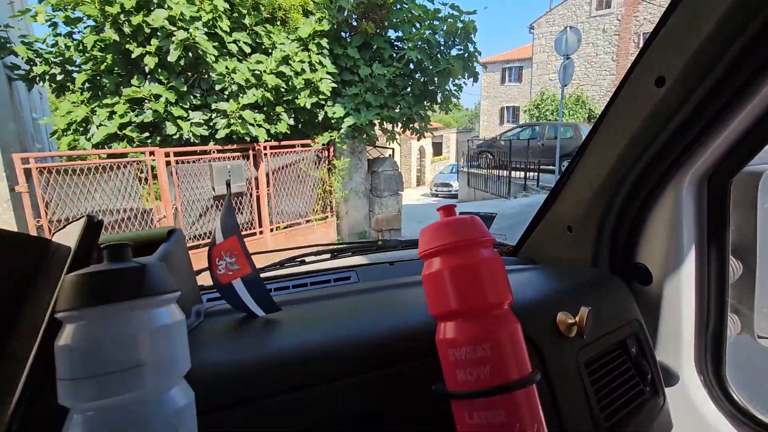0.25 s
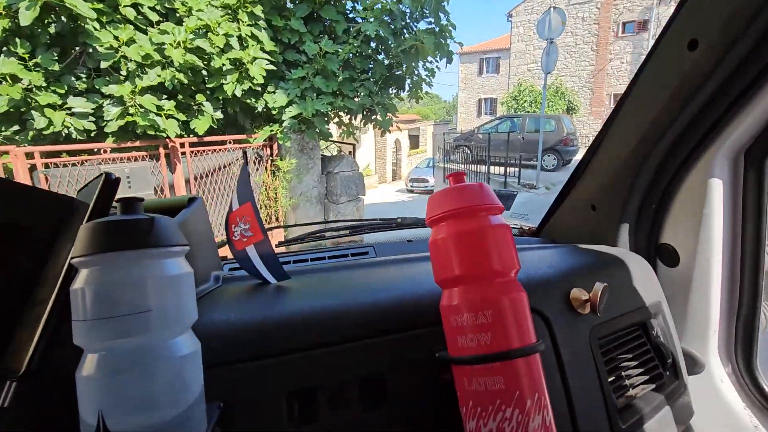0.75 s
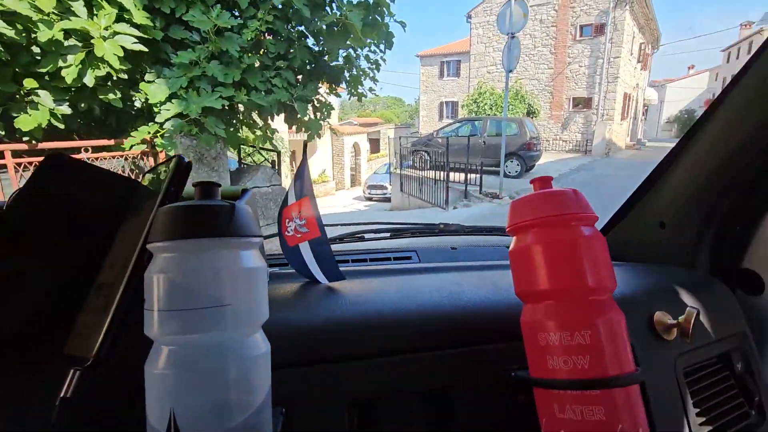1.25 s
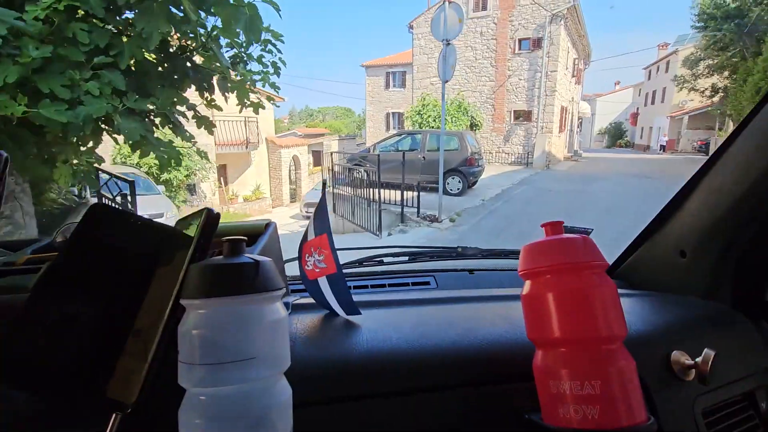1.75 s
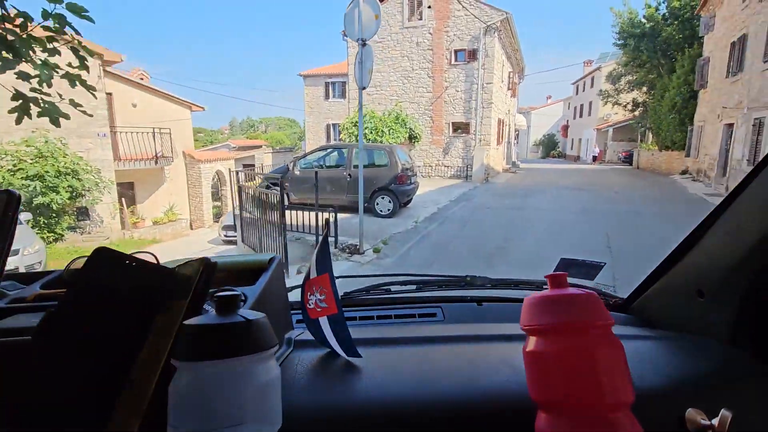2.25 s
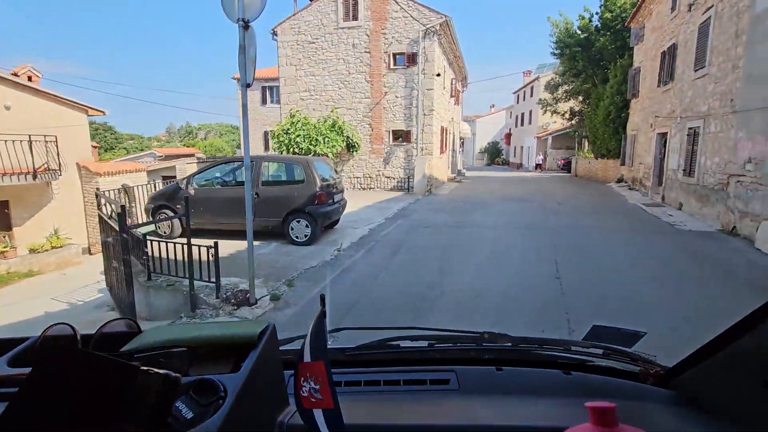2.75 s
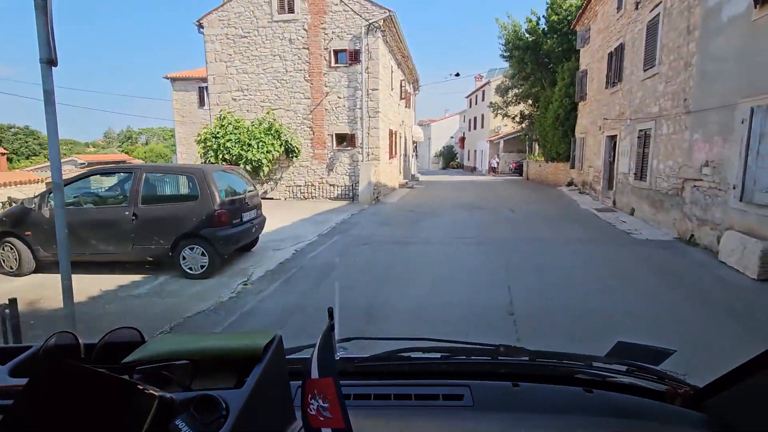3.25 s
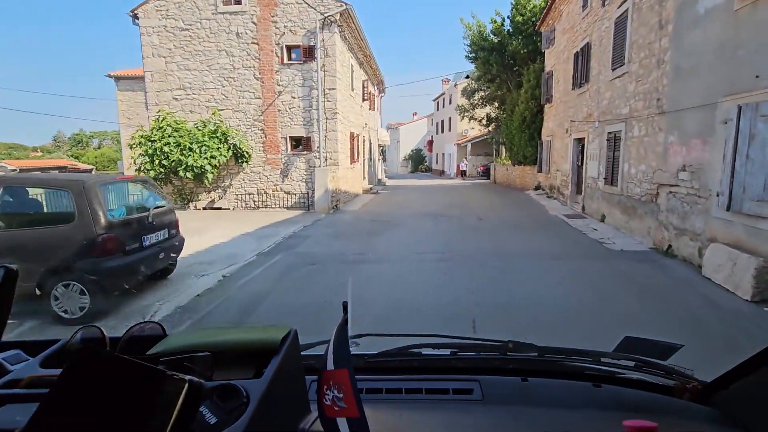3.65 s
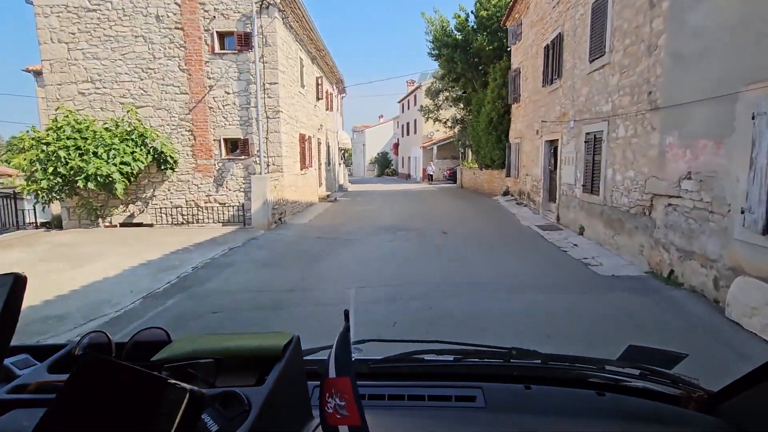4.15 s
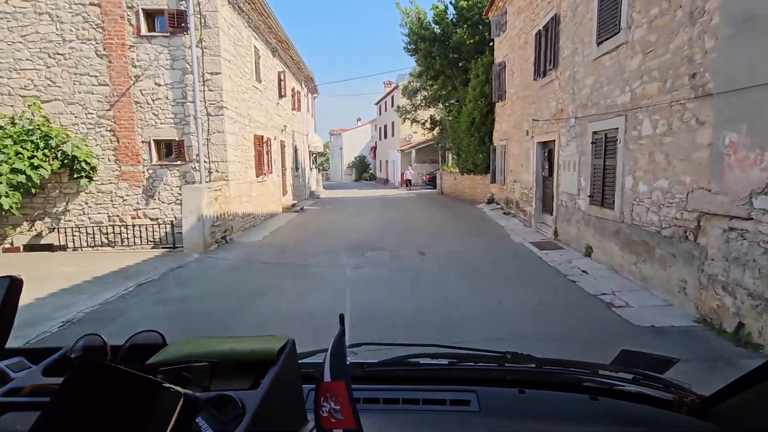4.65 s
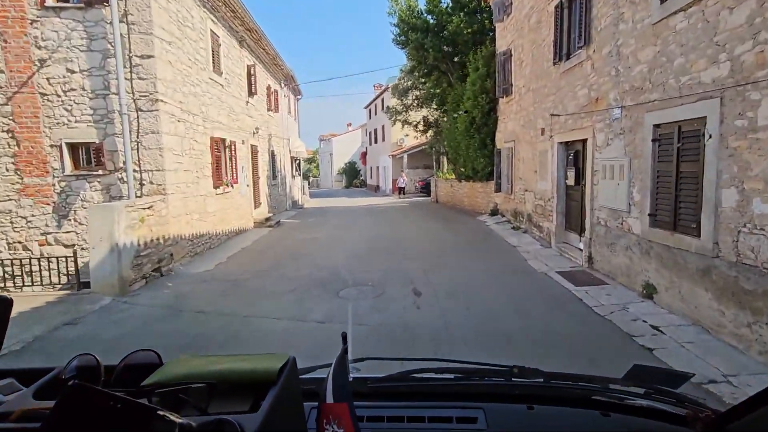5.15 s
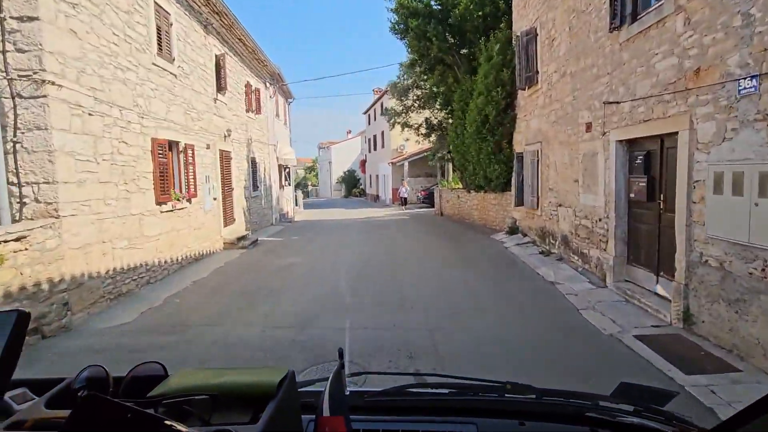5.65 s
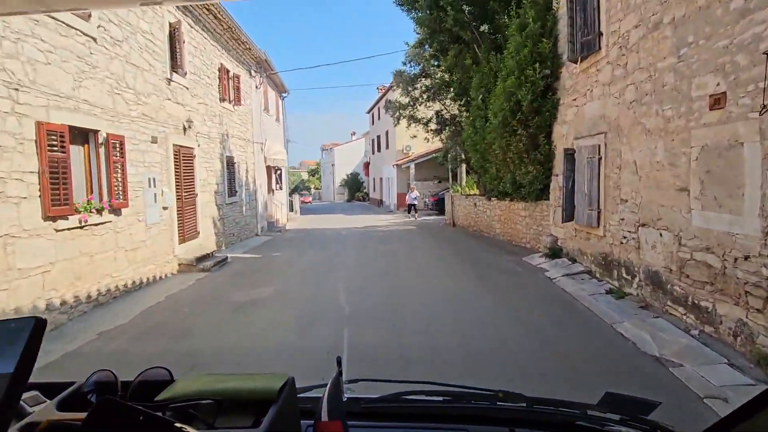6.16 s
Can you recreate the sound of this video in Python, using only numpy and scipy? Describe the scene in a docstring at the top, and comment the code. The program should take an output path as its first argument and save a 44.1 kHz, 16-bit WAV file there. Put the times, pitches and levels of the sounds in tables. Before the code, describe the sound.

Cab interior of a rolling diesel van: droning engine revs up, changes gear, revs again, while bumps thud and loose plastic ticks and knocks.

```python
"""Diesel van changing up a gear

Inside the cab along a village street: the engine climbs, the driver changes up, and it climbs again.
Tones and panel resonances locked to the firing rate make its boom and knock; noise bands make the rattle.
Tyres rumble in coloured noise, and bumps swell the bass of the cab and thud.
Hard plastic snaps once in a run of ringing contacts, loose things tick, squeak and knock in short bursts,
and a swish of noise brushes past during the gear change."""
import sys
import numpy as np
from scipy import signal
from scipy.fft import rfft, irfft
from scipy.io import wavfile
from scipy.ndimage import uniform_filter1d

SR = 44100
rng = np.random.default_rng(int(sys.argv[2]) if len(sys.argv) > 2 else 0)


def store_pcm(level_fs):
    """Save levels as 16-bit WAV."""
    pcm = np.round(np.clip(level_fs, -1, 1) * 32767).astype(np.int16)
    wavfile.write(sys.argv[1], SR, np.atleast_2d(pcm).T)


N = 282240
TIME = np.arange(N) / SR

# bumps in the road: (t/s, body shake level/dB, cab drumming level/dB, thud level/dB)
BUMPS = [(0.16, -23.5, -19, -45), (0.679, -24, -33.5, -28.5), (1.296, -36.5, -15.5, -51),
         (1.558, -28, -19, -51), (2.001, -22.5, -25, -50), (2.77, -20.5, -23.5, -30.5),
         (3.3, -21.5, -18.5, -38), (3.829, -27, -16.5, -45.5), (4.12, -32.5, -18, -49)]
# colour of light plastic contacts, before any tilt: (f/Hz, level/dB)
TICK_COLOUR = [(800, -22.5), (2500, -3.5), (5000, -2), (7500, -3.5), (9500, -4.5), (11600, -1.5),
               (13500, -4.5), (16000, -10)]
# level of one buzzing panel, which comes and goes: (t/s, level/dB)
PANEL_BUZZ = [(0, -2), (.33, 4.5), (.55, -3), (.9, -3), (1.08, 2), (1.16, -2), (1.65, 0), (1.77, -4),
              (1.87, 1.5), (2.04, 2), (2.13, -4), (2.3, -3), (2.42, 7), (2.6, -1), (4.5, -2), (6.4, -2.5)]


def from_db(db):
    """Decibels to gain."""
    return 10 ** (np.asarray(db) / 20)


def rms_one(x):
    """Scale to unit power."""
    return x / np.sqrt(np.mean(x ** 2) + 1e-20)


def in_time(rows):
    """Each column of a curve at every sample."""
    s, *columns = np.transpose(rows)
    return [np.interp(TIME, s, column) for column in columns]


def at_hz(points, hz):
    """Read a spectrum on a log-frequency axis."""
    f, value = np.transpose(points)
    return np.interp(np.log(hz + 1), np.log(f), value)


def drift(rate):
    """A random wander of rms 1, through a given number of knots per second."""
    knots = rng.standard_normal(int(N / SR * rate) + 2)
    return rms_one(np.interp(TIME * rate, np.arange(len(knots)), knots))


def swell(s, rise_s, fall_s):
    """An envelope that grows exponentially to 1 at a given time and dies away."""
    return np.exp(-np.maximum((s - TIME) / rise_s, (TIME - s) / fall_s))


def dying(t, t60):
    """Decay by 60 dB in t60."""
    return np.exp(-np.log(1000) * t / t60)


def in_cab(mid, side, hz):
    """Two unrelated spectra become left and right: alike in the bass, diffuse in the treble."""
    # how alike the two sides are: (f/Hz, correlation)
    likeness = [(60, .99), (115, 0.91), (200, 0.71), (380, 0.74), (700, 0.16), (1290, -0.5), (2300, 0.056),
                (4400, -0.11), (16000, 0.062)]
    # left over right: (f/Hz, level/dB)
    balance = [(60, 0.5), (130, -2.5), (280, 3), (550, 0.5), (1100, 0.5), (2200, 1), (12000, 1)]
    alike = np.clip(at_hz(likeness, hz), -1, 1)
    sign = np.array([[1], [-1]])
    sides = np.sqrt(1 + alike) * mid + sign * np.sqrt(1 - alike) * side
    return sides * from_db(sign * at_hz(balance, hz) / 2)


def noise(colour, size=N):
    """Stereo noise of a given colour, falling away beyond its ends; rms 1."""
    hz = np.fft.rfftfreq(size, 1 / SR)
    ends = np.minimum(hz / colour[0][0], 1) ** 2 / np.maximum(hz / colour[-1][0], 1) ** 2
    mid, side = rfft(rng.standard_normal((2, size))) * from_db(at_hz(colour, hz)) * ends
    return rms_one(irfft(in_cab(mid, side, hz), size))


def even(x, span_s):
    """Hold the power of a vibration steady over a short span."""
    power = uniform_filter1d(np.mean(x ** 2, axis=0), max(int(span_s * SR), 2))
    return x / np.sqrt(np.maximum(power, 0) + 1e-12)


def resonance(x, hz, width_hz):
    """A two-pole resonance with gain 1 on top."""
    r = np.exp(-np.pi * width_hz / SR)
    zeros = np.array([1, 0, -1]) * (1 - r * r) / 2
    poles = [1, -2 * r * np.cos(2 * np.pi * hz / SR), r * r]
    return signal.lfilter(zeros, poles, x)


def through(modes, hz):
    """The gain of a set of resonances at a moving frequency."""
    power = sum(from_db(db) ** 2 / (1 + ((hz - f) / width) ** 2 * 2) ** 2 for f, width, db in modes)
    return np.sqrt(power)


def add(out, s, sound):
    """Mix a short sound in at a given time."""
    start = int(s * SR)
    out[:, start:start + sound.shape[1]] += sound[:, :N - start]


def burst(colour, t60, rise_s):
    """A contact and its dense reflections in the small cab, as decaying noise."""
    t = TIME[:SR // 4]
    return noise(colour, size=len(t)) * dying(t, t60) * (1 - np.exp(-t / rise_s))


def cab_echoes(x, wet_db, t60):
    """Windscreen and dashboard return a dense spray of early reflections that colours bright sounds."""
    t = TIME[:SR // 16]
    spray = rms_one(rng.standard_normal((2, len(t))) * dying(t, t60))
    response = spray * from_db(wet_db) / np.sqrt(len(t))
    response[:, 0] += 1  # the direct sound
    return signal.fftconvolve(x, response, axes=1)[:, :N] / np.sqrt(1 + from_db(wet_db) ** 2)


def air_hiss():
    """Air hisses unsteadily in the treble, with close reflections."""
    # level before the echoes: (t/s, level/dB)
    air = [(0, -63.5), (.3, -60.5), (2.2, -60.5), (3.2, -70.5), (3.55, -63.5), (3.9, -73), (4.6, -63),
           (5.85, -68), (6.4, -66)]
    # colour: (f/Hz, level/dB)
    hiss_colour = [(1500, -17.5), (3500, 3), (5300, 0.5), (6500, -4.5), (7500, -3), (10000, -11.5),
                   (10900, -9), (11600, -3), (12500, -10.5), (16000, -10)]
    hiss = from_db(in_time(air)[0] + 1.0 * drift(31)) * noise(hiss_colour)
    return cab_echoes(hiss, wet_db=-8.0, t60=0.043)


def bass_of_road(rolling_db):
    """Bumps shake the body, drum the cab's lowest air mode and swell the low tyre rumble."""
    # colours of the body shake, cab drumming and tyre rumble: (f/Hz, level/dB per Hz)
    shake_colour = [(15, -16.5), (24, -15), (33, 7.5), (44, -1), (55, -10), (80, -39.5)]
    drum_colour = [(35, -44.5), (48, -12), (56, 4), (62, 0), (72, -22.5), (95, -28.5)]
    rumble_colour = [(55, -25.5), (80, 1), (105, 2.5), (130, -6.5), (165, -12.5), (220, -34.5), (400, -52)]
    # level of the tyre rumble between bumps: (t/s, level/dB)
    rumbling = [(0, -38.5), (1, -33), (1.5, -32.5), (2.1, -39.5), (2.8, -35), (3.1, -38), (3.3, -34.5),
                (3.8, -40), (4.5, -32), (5.3, -31.5), (5.9, -37), (6.4, -38)]
    shake_db, drum_db = -37.5, -36  # at a rolling level of 0 dB
    bump_rise_s, bump_fall_s = 0.098, 0.083
    bump_rumble_db = -8.5  # tyre rumble against the shake of a bump
    steady = from_db(0.85 * rolling_db)  # the bass follows only a share of the swing
    jolt, boom = sum(from_db([[bump_shake], [bump_drum]]) * swell(s, bump_rise_s, bump_fall_s)
                     for s, bump_shake, bump_drum, _ in BUMPS)
    shake = np.hypot(from_db(shake_db) * steady, jolt) * even(noise(shake_colour), span_s=0.28)
    drum = np.hypot(from_db(drum_db) * steady, boom) * even(noise(drum_colour), span_s=0.041)
    rumble_gain = np.hypot(from_db(in_time(rumbling)[0]), from_db(bump_rumble_db) * jolt)
    return shake + drum + rumble_gain * even(noise(rumble_colour), span_s=0.44)


def tyre_roar(rolling_db):
    """The tyres roar unevenly on the surface, throbbing for a while as the van gathers speed."""
    # colour: (f/Hz, level/dB per Hz)
    roar_colour = [(110, -20.5), (170, -6.5), (215, 0), (280, -2.5), (335, 2), (390, -8.5), (460, -3.5),
                   (530, -8), (640, -7.5), (790, -11.5), (900, -7.5), (1000, -22.5), (2500, -53.5)]
    roar_db = -45  # at a rolling level of 0 dB
    throb_at_s, throb_per_s, throb_depth_db, throb_fade_s = 4.46, 5.1, 1, 0.81
    lumps_db = 1.6 * drift(18)
    throb = np.cos(2 * np.pi * throb_per_s * (TIME - throb_at_s))
    throb_db = throb_depth_db * swell(throb_at_s, throb_fade_s, throb_fade_s) * throb
    return from_db(roar_db + rolling_db + lumps_db + throb_db) * even(noise(roar_colour), span_s=0.43)


def road():
    """Road bass and tyre roar share one rolling level; air hiss lies above them."""
    # how hard the tyres work on the road surface: (t/s, level/dB)
    rolling = [(0, -0.5), (.3, 4.5), (1.5, 0.5), (2.05, -7.5), (2.5, -6.5), (2.8, 3), (3.1, -7.5), (3.3, 2),
               (4.2, 2), (5.4, 4), (6.4, -.5)]
    rolling_db, = in_time(rolling)
    return bass_of_road(rolling_db) + tyre_roar(rolling_db) + air_hiss()


def thumps(t60):
    """A bump passes through the suspension as a dull thud."""
    # colour: (f/Hz, level/dB)
    thump_colour = [(110, -6.5), (200, -6.5), (250, 2.5), (330, -11.5), (700, -19)]
    out = np.zeros((2, N))
    for s, _, _, db in BUMPS:
        add(out, s, from_db(db) * burst(thump_colour, t60, rise_s=0.0014))
    return out


def jiggle(count, level_db, spread_db):
    """Bottles and holders touch faintly at random times, each touch ringing at a random pitch."""
    out = np.zeros((2, N))
    for when, softness, pitch in rng.random((count, 3)):
        contact = burst(TICK_COLOUR, 0.079, rise_s=.001)
        touch = rms_one(resonance(contact, 2800 * 4 ** pitch, 1700))
        add(out, when * N / SR, from_db(level_db - spread_db * softness) * touch)
    return out


def squeaks(gain_db, wobble, overtone_db):
    """Rubbing plastic sticks and slips in a brief, unsteady tone with overtones."""
    # each squeak, level before the gain: (t/s, length/s, f/Hz, level/dB)
    rubs = [(2.551, 0.062, 2800, -60), (2.624, 0.033, 2500, -62), (2.734, 0.035, 2860, -61),
            (2.753, 0.032, 2470, -61), (3.055, 0.05, 3200, -63), (3.185, 0.023, 2270, -64),
            (3.208, 0.0184, 2140, -67)]
    out = np.zeros((2, N))
    for s, length, hz, db in rubs:
        envelope = np.hanning(int(length * SR))
        slip = rms_one(uniform_filter1d(rng.standard_normal(len(envelope)), 40))
        turns = np.cumsum(hz * (1 + wobble * slip)) / SR
        tone = sum(from_db(overtone_db * (k - 1)) * np.sin(2 * np.pi * k * (turns + rng.random((2, 1))))
                   for k in range(1, 5))
        add(out, s, from_db(db + gain_db) * np.sqrt(2) * envelope * tone)
    return out


def ticks(t60, gain_db, ring_db, ring_width_hz):
    """Loose plastic ticks on the dashboard, each piece with a brightness and a ring of its own."""
    # each tick, level before the gain; brightness tilts the colour, -9 dB leaving it flat:
    # (t/s, level/dB, brightness/dB, ring f/Hz)
    taps = [(0.2148, -46, -13, 11700), (0.289, -38.5, -11, 7000), (0.599, -45, -7, 4500),
            (0.6365, -41.5, -9, 6500), (0.971, -40.5, -10, 7300), (1.321, -41, -10, 6650),
            (1.656, -38.5, -13, 7500), (1.83, -50.5, -6, 6900), (2.002, -47, -9, 6400),
            (2.339, -45, -14, 7070), (2.6896, -47, -12, 6500), (3.024, -44.5, -16, 6940),
            (3.0977, -39, -15, 11700), (3.119, -31, -10.5, 7450), (3.15, -46, -10, 6500),
            (3.23, -43, -14, 5100), (3.431, -50.5, -14, 4100), (3.6, -46, -18, 4400),
            (3.629, -50, -10, 5170), (3.694, -50, -8, 5140), (4.0637, -48, -11.5, 5170),
            (4.297, -42, -17.5, 11700), (4.32, -43.5, -14, 11700), (4.357, -44, -15.5, 11700),
            (4.411, -46, -11, 11700), (4.4336, -44, -15, 11700), (4.555, -47, -14, 11700),
            (5.89, -52, -17, 4100), (6.112, -48.5, -13, 5200)]
    out = np.zeros((2, N))
    for s, db, top_db, ring_hz in taps:
        tilt_db_per_octave = top_db + 9.0
        colour = [(hz, level + tilt_db_per_octave * np.log2(hz / 6000)) for hz, level in TICK_COLOUR]
        touch = burst(colour, t60, rise_s=0.00092)
        ring = from_db(ring_db) * resonance(touch, ring_hz, ring_width_hz)
        add(out, s, from_db(db + gain_db) * (touch + ring))
    return out


def brush_past():
    """A brushing swish of bright noise swells and fades."""
    # colour: (f/Hz, level/dB)
    brush_colour = [(900, -18.5), (2400, -0.5), (3500, 3), (6000, 2.5), (9500, -0.5), (11600, 3.5),
                    (16000, 0)]
    return from_db(-53) * swell(2.783, rise_s=0.13, fall_s=0.1) * noise(brush_colour)


def knocks(gain_db):
    """The trim knocks as the body flexes: noise contacts ring its resonances, each with a brightness of its
    own."""
    # each knock, level before the gain: (t/s, level/dB, t60/s, brightness f/Hz)
    contacts = [(0.245, -46, 0.21, 2490), (0.347, -46.5, 0.39, 2480), (0.686, -33.5, 0.1, 1720),
                (0.754, -45, 0.1, 4000), (0.973, -41.5, 0.1, 2500), (2.758, -43.5, 0.08, 2200),
                (2.779, -44, 0.083, 2200), (2.799, -41, 0.058, 1900), (4.301, -51, 0.3, 2490),
                (4.4, -47.5, 0.18, 2500), (4.4631, -28, 0.091, 9100), (5.74, -34.5, 0.093, 2190)]
    # what the trim rings with: (f/Hz, width/Hz, level/dB)
    trim = [(1167, 140, 5), (1560, 250, 1.5), (2270, 150, -1), (2930, 150, -2.5), (3900, 740, -6.5),
            (5370, 740, -10.5), (6800, 2600, -16)]
    out, t = np.zeros((2, N)), TIME[:SR // 4]
    for s, db, t60, bright_hz in contacts:
        contact = noise([(300, 0), (bright_hz, 0), (2 * bright_hz, -9)], size=len(t))
        # neighbouring resonances have opposite signs
        rung = rms_one(sum((-1) ** k * from_db(level) * resonance(contact, hz, width)
                           for k, (hz, width, level) in enumerate(trim)))
        add(out, s, from_db(db + gain_db) * rung * dying(t, t60) * (1 - np.exp(-t / 0.00077)))
    return out


def snap(crack_db, spray_db, ring_db, t60):
    """Hard plastic snaps home in a quick run of contacts: a crack, its spray of reflections, a short ring."""
    # the contacts, level shared by crack, spray and ring: (t/s, level/dB)
    contacts = [(1.0880, -8), (1.0905, -13), (1.0935, -13.5)]
    # what the part rings with, relative to the ring level: (f/Hz, level/dB, t60/s)
    modes = [(3923, -25, .05), (4635, -21, .06), (5322, -23, .06), (5480, -27, .05), (7260, -17, .07),
             (7396, -24, .055), (10997, -22, .045), (11256, -24, .045), (11655, -16, .04),
             (11840, -22, .045), (13400, -24, .04), (14700, -22, .04)]
    # colour of crack and spray: (f/Hz, level/dB)
    snap_colour = [(500, -5), (1300, -16.5), (2000, -7.5), (2700, -9.5), (3700, -3), (5300, -1), (6600, -5),
                   (7400, -0.5), (8700, -7), (10000, -6), (11600, 2.5), (13000, -8.5), (14600, -1),
                   (15800, -2)]
    out, t = np.zeros((2, N)), TIME[:SR // 4]
    for s, db in contacts:
        ring = sum(from_db(level) * dying(t, decay) * np.sin(2 * np.pi * (hz * t + rng.random((2, 1))))
                   for hz, level, decay in modes)
        crack = burst(snap_colour, .012, rise_s=.0004)
        spray = burst(snap_colour, t60, rise_s=0.001)
        parts = from_db(crack_db) * crack + from_db(spray_db) * spray + from_db(ring_db) * ring
        add(out, s, from_db(db) * parts)
    return out


def intake_air(load_db):
    """A soft rush of intake air, in narrow noise bands, as the engine pulls in each gear."""
    # each rush, level at a load of 0 dB: (peak t/s, level/dB, centre f/Hz, rise/s, fall/s)
    rushes = [(1.05, -51, 2070, 0.093, 0.26), (2.12, -51, 2222, 0.13, 0.26), (4.7, -57.5, 3720, 0.32, 1),
              (5.5, -52, 1940, 0.44, 0.67)]
    # colour: (multiple of the centre, level/dB)
    rush_colour = [(.7, -17), (.9, -3.5), (1, -0.5), (1.12, -9.5), (1.5, -17.5)]
    out = 0
    for s, db, hz, rise_s, fall_s in rushes:
        colour = [(hz * ratio, level) for ratio, level in rush_colour]
        out = out + from_db(db + 0.96 * load_db) * swell(s, rise_s, fall_s) * noise(colour)
    return out


def whirr(firings):
    """Belt-driven parts give narrow bands of noise that rise with the engine."""
    # bands, level before load and speed: (multiple of the firing rate, width/Hz, level/dB)
    bands = [(34.12, 110, -57.5), (57.45, 300, -68)]
    out = 0
    for order, width_hz, db in bands:
        carrier = np.cos(2 * np.pi * (order * firings + rng.random((2, 1))))
        flutter = noise([(20, 0), (width_hz, 0)]) * carrier
        out = out + from_db(db) * rms_one(flutter)
    return out


def gear_whine(firings, rough):
    """Meshing timing gears give a thin, unsteady tone at a multiple of the firing rate."""
    order = 33
    phase = order * firings + rough * drift(40) + rng.random((2, 1))
    return np.sqrt(2) * (1 + rough * drift(25)) * np.sin(2 * np.pi * phase)


def clatter(firings, depth):
    """Injectors and valves give a bright rattle that swells at each firing."""
    # colour: (f/Hz, level/dB per Hz)
    clatter_colour = [(500, -13.5), (850, -2.5), (1000, 3.5), (1250, 5), (1530, 0), (1750, -1), (2050, 0),
                      (2500, -8), (2950, -8), (3400, -15.5), (5000, -21.5), (8000, -33), (15000, -46.5)]
    return rms_one(noise(clatter_colour) * (1 + depth * np.cos(2 * np.pi * firings)))


def panel_rasp(load_db):
    """The buzzing panel rasps in noise around its resonance."""
    # colour: (f/Hz, level/dB per Hz)
    rasp_colour = [(520, -22.5), (590, -2.5), (630, -3.5), (680, -5), (760, -20.5)]
    return from_db(-56 + .5 * load_db + in_time(PANEL_BUZZ)[0]) * noise(rasp_colour)


def chug(firings, decay_turns):
    """Each firing sends a dull thud through the bulkhead; one cylinder hits hardest: they lope in fours."""
    # strength of each cylinder's thud, in firing order: [level/dB]
    cylinders = [0, -9, -13, -6]
    # colour of the thud: (f/Hz, level/dB per Hz)
    chug_colour = [(130, -15), (180, -9.5), (240, -1), (330, -1.5), (390, -7), (470, -2.5), (600, -5.5),
                   (760, -16.5), (1000, -24.5)]
    strength = from_db(cylinders)[firings.astype(int) % len(cylinders)]
    thuds = uniform_filter1d(strength * np.exp(-(firings % 1) / decay_turns), size=180)
    return rms_one(thuds * noise(chug_colour))


def combustion(firings, rate, load_db, rough):
    """Firing multiples and quarters between drone through the mounts and swell across panel resonances."""
    # panel and cab resonances driven by the firings: (f/Hz, width/Hz, level/dB)
    panels = [(171, 30, -2), (228, 20, 2), (260, 18, 1), (322, 26, 7), (460, 61, -7), (586, 24, -.5),
              (630, 26, 7), (683, 24, 3.5), (722, 20, 1), (772, 30, -4), (880, 53, -18)]
    # lines between the whole multiples, from unequal cylinders: (f/Hz, level/dB)
    uneven = [(150, -7), (325, -3), (460, -7), (600, -17), (900, -17)]
    # drone of each whole multiple through the engine mounts: (f/Hz, level/dB)
    mounts = [(140, -47), (175, -45.5), (205, -54), (245, -50), (290, -55), (340, -50), (390, -63),
              (450, -56), (520, -59), (580, -56.5), (690, -58), (780, -70), (870, -65), (1000, -76)]
    # change of the drone's level: (t/s, level/dB)
    droning = [(0, 0), (1.5, 1), (2.1, -2.5), (2.5, -3.5), (2.9, -10), (3.3, -2), (4.3, 0), (5.5, 3),
               (6.4, 1)]
    knock_db = -53.5  # at a load of 0 dB
    drone_between_db = -8
    buzz_hz, buzz_width_hz = 625, 45
    step = 10  # the lines are computed at a tenth of the sample rate
    out, turns, rate, load_db = 0, firings[::step], rate[::step], load_db[::step]
    buzz_db, drone_db = in_time(PANEL_BUZZ)[0][::step], in_time(droning)[0][::step]
    for quarters in range(14, 81):
        order = quarters / 4
        hz, whole = order * rate, order.is_integer()
        panel_db = knock_db + load_db + (0 if whole else at_hz(uneven, hz))
        buzz = from_db(buzz_db / (1 + ((hz - buzz_hz) / buzz_width_hz) ** 4))
        panel = from_db(panel_db) * through(panels, hz) * buzz
        drone = from_db(at_hz(mounts, hz) + drone_db + (0 if whole else drone_between_db))
        # no two firings are quite alike: level flutters and phase wanders
        flutter, wander = rms_one(uniform_filter1d(rng.standard_normal((2, len(hz))), size=450))
        gain = np.hypot(panel, drone) * (1 + rough * flutter) * np.exp(1j * rough * wander)
        mid = np.exp(2j * np.pi * rng.random())
        sides = in_cab(mid, 1j * mid, np.mean(hz))
        out = out + (gain * sides * np.exp(2j * np.pi * order * turns)).real
    return signal.resample_poly(out, step, 1, axis=1)[:, :N]


def engine_boom(firings, rate, load_db, waver_db):
    """The firing tone fills the cab almost pure; its next two multiples swell as they cross air modes."""
    # firing tone in the cab: (t/s, level/dB)
    boom = [(0, -19.5), (.22, -18.5), (.33, -22), (.43, -35), (.52, -18), (.77, -17.5), (.85, -25),
            (.93, -20), (1.04, -21.5), (1.2, -18), (1.55, -12.5), (1.75, -11.5), (2.48, -13.5), (2.58, -22),
            (2.75, -18.5), (2.9, -35), (3.1, -28), (3.17, -40), (3.23, -22.5), (3.45, -36), (3.58, -21.5),
            (3.66, -36), (3.73, -19.5), (3.95, -20.5), (4.7, -13), (4.97, -14.5), (5.07, -17),
            (5.35, -15.5), (5.75, -12), (6.4, -13)]
    # cab air modes that the multiples glide through: (f/Hz, width/Hz, level/dB)
    cab_modes = [(60.5, 6.6, 13.5), (88, 11, 0.5), (113.9, 17, -0.5), (133, 13, -6)]
    drive_db = -31 + 0.61 * load_db
    gains = [from_db(in_time(boom)[0])]
    for k in range(2, 4):
        gains.append(from_db(drive_db + waver_db * drift(13)) * through(cab_modes, k * rate))
    tones = sum(gain * np.sin(2 * np.pi * (k * firings + rng.random())) for k, gain in enumerate(gains, 1))
    return np.sqrt(2) * tones * from_db(np.array([[.2], [-.2]]))


def engine():
    """All engine layers follow one firing count; clatter gains close reflections through the dashboard."""
    # four-cylinder engine speed: (t/s, firings per s)
    speed = [(0, 41.1), (.15, 41.8), (.27, 39.9), (.38, 40), (.55, 41.8), (.68, 42), (.93, 40.7),
             (1.03, 41.9), (1.22, 44.95), (1.56, 45.05), (1.68, 45.9), (1.8, 47.8), (1.97, 48.7),
             (2.15, 50.4), (2.45, 52.2), (2.53, 52.1), (2.65, 44.5), (2.8, 35), (3.6, 32.5), (3.88, 31.3),
             (4.25, 34.2), (4.5, 35.7), (4.7, 37.35), (5.21, 41.9), (5.8, 47.5), (6.16, 51.35), (6.4, 53.5)]
    # engine load, dropping away for the gear change: (t/s, level/dB)
    load = [(0, -2.5), (.85, -2.5), (1.15, 1.5), (1.6, 6.5), (2.03, 0), (2.22, 0), (2.44, -2), (2.57, -23),
            (2.79, -13), (3.05, -27.5), (3.3, -8), (4.2, -9.5), (5.6, -3), (6.4, -4.5)]
    # the drivetrain rocks after the clutch bites, swinging the engine speed (depth in firings per s)
    shuffle_at_s, shuffle_per_s, shuffle_depth = 4.3, 3.05, .55
    rocking = np.cos(2 * np.pi * shuffle_per_s * (TIME - shuffle_at_s))
    rate = in_time(speed)[0] + shuffle_depth * swell(shuffle_at_s, rise_s=.2, fall_s=.9) * rocking
    load_db, = in_time(load)
    firings = np.cumsum(rate * (1 + .001 * drift(12))) / SR
    octaves = np.log2(rate / 44)  # above a cruise of 44 firings per s

    # levels in dB: base, share of the load's swing, change per octave of speed
    belts = from_db(.7 * load_db + 11.5 * octaves) * whirr(firings)
    whine = from_db(-63.5 + load_db) * gear_whine(firings, rough=0.51)
    rattle = from_db(-49.5 + 0.38 * load_db + 0.5 * octaves) * clatter(firings, depth=0.18)
    thuds = from_db(-47.5 + .3 * load_db - 11 * octaves) * chug(firings, decay_turns=.35)
    knock = combustion(firings, rate, load_db, rough=.14)
    boom = engine_boom(firings, rate, load_db, waver_db=1.5)
    bright = intake_air(load_db) + belts + whine + cab_echoes(rattle, wet_db=-7.0, t60=0.064)
    return bright + panel_rasp(load_db) + thuds + knock + boom


def scene():
    """Everything heard from the passenger seat."""
    small = jiggle(count=36, level_db=-71.0, spread_db=9.0)
    small += squeaks(gain_db=6.0, wobble=0.062, overtone_db=-11.0)
    small += ticks(t60=0.068, gain_db=-5.0, ring_db=6.0, ring_width_hz=560)
    loud = thumps(t60=0.27) + knocks(gain_db=1.5)
    loud += snap(crack_db=-2.5, spray_db=-6.0, ring_db=1.5, t60=0.074)
    return road() + cab_echoes(small + brush_past(), wet_db=-7.5, t60=0.021) + loud + engine()


def record(dry):
    """The sound starts and stops without a click; the top is cut steeply."""
    cutoff_hz, fade_s = 15900, .004
    edges = np.sin(np.pi / 2 * np.clip(np.minimum(TIME, TIME[-1] - TIME) / fade_s, 0, 1)) ** 2
    return signal.sosfilt(signal.ellip(10, .1, 80, cutoff_hz, fs=SR, output="sos"), dry * edges)


dry = scene()
out = record(dry)
store_pcm(out)
```